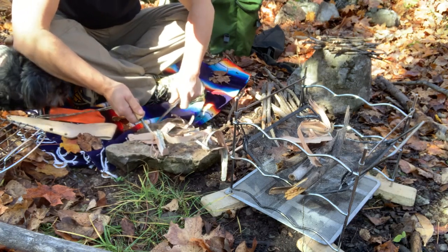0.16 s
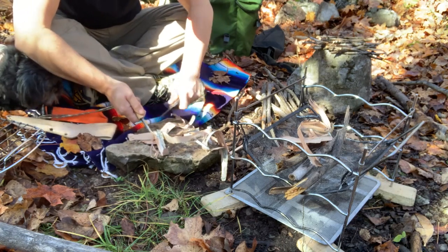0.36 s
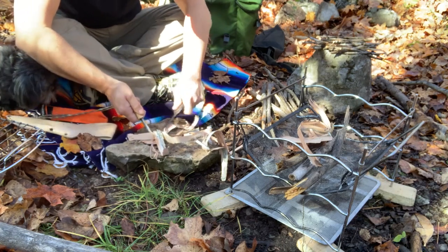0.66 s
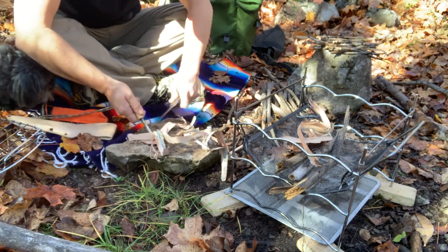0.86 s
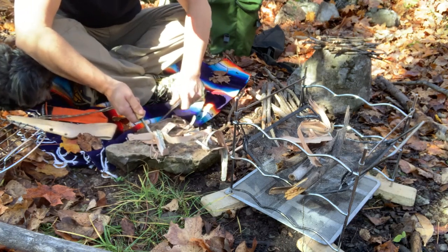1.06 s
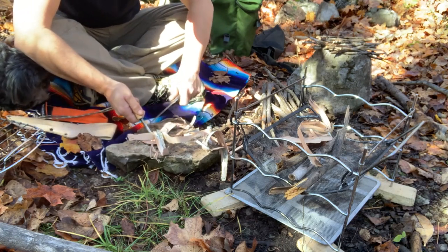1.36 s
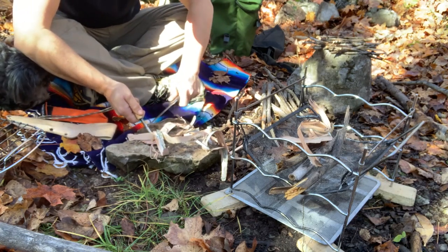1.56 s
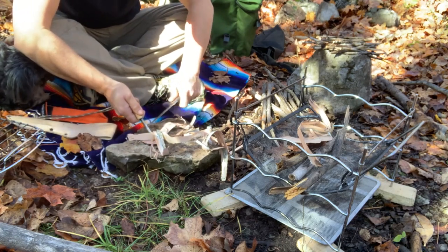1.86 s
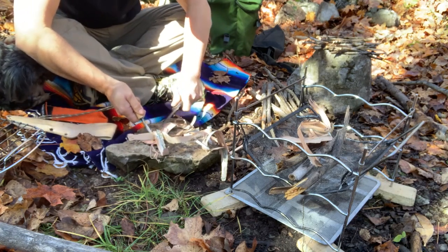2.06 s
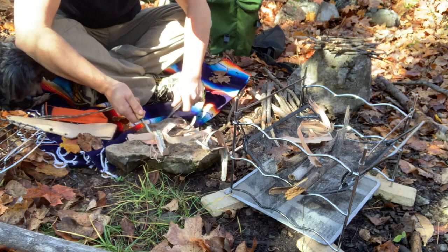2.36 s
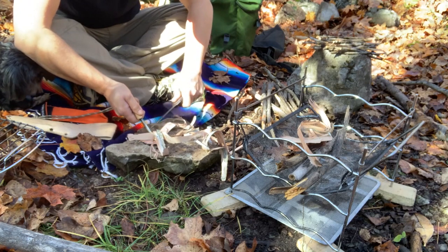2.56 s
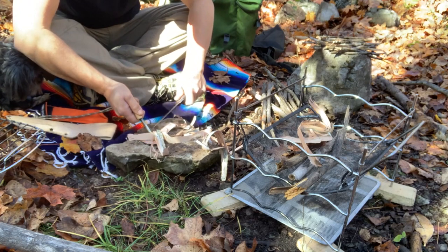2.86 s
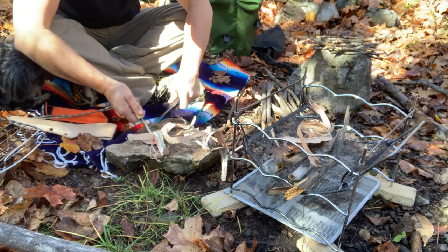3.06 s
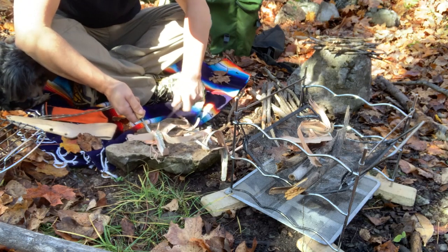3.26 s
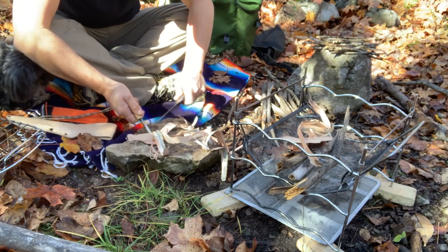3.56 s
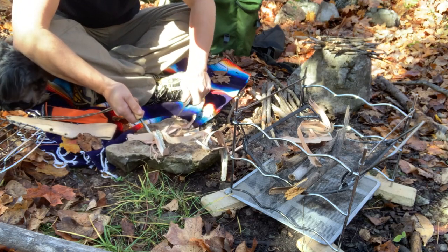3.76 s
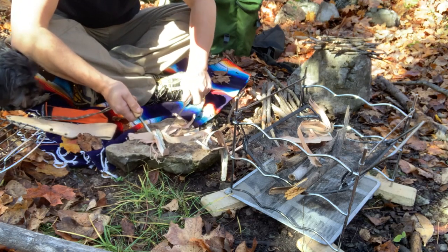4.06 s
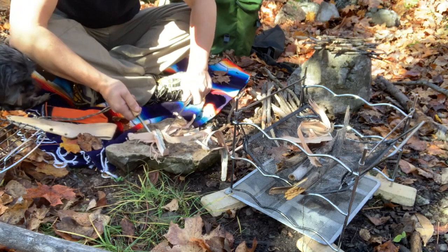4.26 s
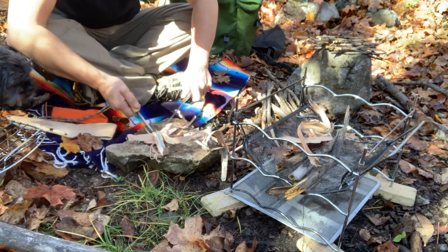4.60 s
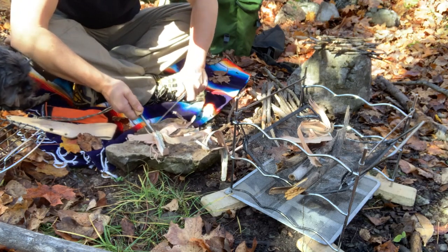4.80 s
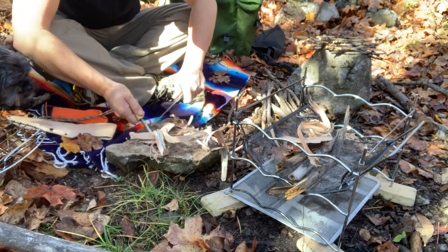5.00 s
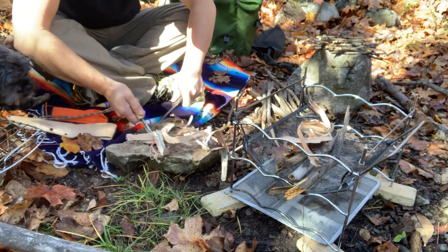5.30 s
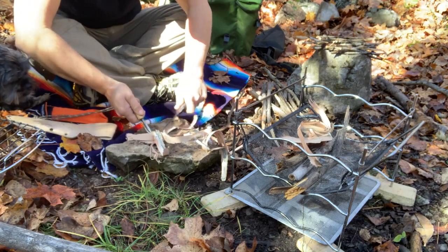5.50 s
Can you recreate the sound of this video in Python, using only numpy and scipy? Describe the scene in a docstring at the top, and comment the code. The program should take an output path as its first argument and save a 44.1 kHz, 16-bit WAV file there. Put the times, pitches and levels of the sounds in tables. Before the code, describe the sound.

Very close to the microphone, a steel striker scrapes a ferro rod in short, gritty, bright rasps with ringing edges and dry ticks. Bursts come in the first second, around two seconds and just after three, then dwindle to clicks and near quiet before a last quick scrape. Soft low outdoor rumble and a faint wavering engine lie behind, with slight echoes from ground and trees.

```python
"""Short, uneven rasps and sharp ticks sound close by: a steel striker scraped along a ferro rod outdoors.
The edge tears off tiny chips, made as random clicks that hiss and rasp and make the steel ring.
Snags are short crunches that ring the tip and knock the rod; a few dry leaves rustle softly.
Echoes follow from the ground and trees. Behind them a far engine drones in the low rumble of the woods."""
import sys
import numpy as np
from scipy import signal
from scipy.fft import rfft, irfft
from scipy.io import wavfile

SR = 44100
rng = np.random.default_rng(int(sys.argv[2]) if len(sys.argv) > 2 else 0)


def bounce(signal):
    """Save signal as a 16-bit WAV file at the path given by the first command-line argument."""
    frames = np.transpose(np.atleast_2d(signal))
    limited = np.clip(frames, -1, 1)
    pcm = np.round(limited * 32767).astype(np.int16)
    wavfile.write(sys.argv[1], SR, pcm)


N = 248724
TIME = np.arange(N) / SR   # seconds

# Resonances of the hand-held blade and rod: (frequency [Hz], width [Hz], level [dB])
STEEL_MODES = [(2310, 260, -15.5), (2664, 170, -15), (3360, 440, -12), (3980, 190, -4), (4310, 200, -4.5),
               (4890, 440, -6), (5650, 240, -4), (6050, 280, -5.5), (6570, 530, 1.5), (7154, 100, 0),
               (8000, 170, 1), (8480, 180, 2), (8820, 270, 0), (9190, 220, -8), (11700, 500, -4.5),
               (13740, 260, -7.5)]


def from_db(db):
    """Turn decibels into a gain."""
    return 10 ** (np.asarray(db) / 20)


def rms_one(x):
    """Scale a signal to an average power of one."""
    return x / np.sqrt(np.mean(x ** 2) + 1e-20)


def at_hz(points):
    """Read a (frequency, value) table at every spectral line, along a log-frequency axis."""
    hz, value = np.transpose(points)
    line_hz = np.fft.rfftfreq(N, 1 / SR) + 1   # the 1 avoids the log of zero
    return np.interp(np.log(line_hz), np.log(hz), value)


def colour(x, spectrum):
    """Shape a signal by a spectrum; white noise keeps its power."""
    gain = rms_one(from_db(at_hz(spectrum)))
    return irfft(rfft(x) * gain, N)


def drift(rate):
    """A random, gliding curve of spread 1 that takes about `rate` new values a second."""
    knots = np.cumsum(rng.uniform(1 / 2, 3 / 2, N // 20)) - 2
    return np.interp(TIME * rate, knots, rng.standard_normal(len(knots)))


def resonate(x, hz, width_hz):
    """Ring one resonance; a narrower one rings longer, and white noise keeps its power."""
    radius = np.exp(-np.pi * width_hz / SR)
    angle = 2 * np.pi * min(hz, SR / 2) / SR
    ringing = signal.lfilter([1, 0, -1], [1, -2 * radius * np.cos(angle), radius ** 2], x + 1e-18)
    return np.sqrt((1 - radius ** 2) / 2) * ringing


def add(out, s, sound):
    """Mix a sound into `out` at time s."""
    at = round(s * SR)
    out[at:at + len(sound)] += sound[:N - at]


def scrapes():
    """Each contact plays a run of fractures, heard directly as hiss and rasp and through the ringing steel."""
    # Chips tearing off: (frequency [Hz], relative density [dB])
    chip_spectrum = [(1400, -30.5), (2300, -5.5), (3200, 2.5), (4200, 8.5), (5200, 8.5), (7000, 0.5),
                     (9500, -8), (11000, -3), (15000, -27.5)]
    # Finest dust: (frequency [Hz], relative density [dB])
    dust_spectrum = [(7000, -21.5), (10000, 8), (12200, 12), (13400, 7.5), (14400, 13), (15400, 1.5),
                     (16000, -26.5)]
    # Dull part of the rasp: (frequency [Hz], relative density [dB])
    rasp_spectrum = [(120, 10.5), (220, 0), (400, -3.5), (700, -2.5), (1350, -1), (1750, -3.5), (2300, 2.5),
                     (3100, 0.5), (4500, -24)]
    wander_db, wander_per_s = 3, 60   # each mode swells and fades as the edge travels

    def mode_grip():
        """How strongly one mode is driven; random signs keep the modes from moving in step."""
        return rng.choice([-1, 1], N) * rms_one(from_db(wander_db * drift(wander_per_s)))

    grip = np.array([mode_grip() for _ in STEEL_MODES])
    coarse, fine, dull, ringing = np.zeros((4, N))
    for span, force, ring_db, ring_hz, tilt_db, dust_db, rasp_db in contacts():
        ring = from_db(ring_db)
        share = 1 / np.sqrt(1 + ring ** 2)   # the ring takes its power from the hiss
        coarse[span] += share * force
        ringing[span] += share * ring * steel(force, grip[:, span], ring_hz, tilt_db)
        fine[span] += force * from_db(dust_db)
        dull[span] += force * from_db(rasp_db)
    bright = colour(coarse, chip_spectrum) + colour(fine, dust_spectrum) + ringing
    return from_db(-4.0) * bright + colour(dull, rasp_spectrum)


def contacts():
    """Give each contact's samples, force, ring and colour settings; strokes tear densely, slides crackle."""
    # Firm strokes along the rod: (start [s], end [s], level [dB], swell from start to end [dB],
    # bite [0-1], ring against hiss [dB], first favoured pitch [Hz], second favoured pitch [Hz])
    stroke_table = [(0.118, 0.205, -56.5, 6, 0.42, 10, 2750, 4020),
                    (0.199, 0.231, -44, 15.5, 0.39, 10, 7190, 8050),
                    (0.246, 0.285, -42.5, 1, 0.76, 3, 7190, 6060),
                    (0.554, 0.561, -40.5, 3.5, 0.71, 2, 7190, 13600),
                    (0.591, 0.599, -45.5, -7, 0, 15, 4380, 2500),
                    (0.612, 0.617, -36.5, -4, 0.62, 6, 7190, 13600),
                    (0.668, 0.69, -41, -2, 0.85, 0, 8780, 11600),
                    (0.94, 0.969, -40, 4.5, 0.45, 12, 9450, 6060),
                    (0.977, 1.013, -38, -0.5, 0.86, 5, 8780, 6550),
                    (1.021, 1.032, -40.5, 11.5, 0.88, 11, 6550, 11600),
                    (1.047, 1.099, -50, -9.5, 1, -1, 8050, 11600),
                    (1.927, 1.932, -44, -3, 0.23, 26, 8400, 3950),
                    (1.955, 1.974, -32, 1.5, 0.64, 28, 6060, 9450),
                    (1.986, 2.008, -36.5, 4, 0.44, 12, 7190, 8780),
                    (2.108, 2.162, -40.5, 6, 0.89, 12, 6550, 6550),
                    (2.173, 2.216, -38, -2, 0.88, 10, 8050, 6550),
                    (2.233, 2.254, -35.5, 7, 0.5, 14, 8780, 6060),
                    (2.275, 2.287, -34.5, -0.5, 0.44, 24, 8780, 7190),
                    (2.297, 2.322, -52, -8, 0.9, -10, 7190, 8780),
                    (2.361, 2.448, -49, -12.5, 0.98, 3, 11600, 6550),
                    (2.468, 2.529, -43.5, -2.5, 0.94, 5.5, 11600, 6550),
                    (3.109, 3.123, -47, 0, 0.34, 11, 4380, 2500),
                    (3.193, 3.22, -35.5, 13.5, 0.73, 5.5, 7190, 9450),
                    (3.243, 3.268, -43.5, -10.5, 0.9, 2, 6550, 2500),
                    (3.296, 3.365, -42.5, -13, 0.86, 10, 6550, 5560),
                    (3.394, 3.463, -43, -4.5, 0.87, 3, 6550, 5560),
                    (5.434, 5.487, -48.5, 20.5, 0, 11, 3870, 6080),
                    (5.493, 5.51, -40, 11, 0.51, 8, 7190, 4380),
                    (5.512, 5.538, -47.5, -4, 1, 1, 4380, 6550)]
    # The blade slides lightly into place between strokes: (start [s], end [s], level [dB])
    slide_table = [(0.35, 0.431, -53.5), (0.511, 0.61, -58.5), (0.727, 0.741, -51), (0.778, 0.864, -53.5),
                   (1.123, 1.196, -52.5), (1.238, 1.292, -54), (1.401, 1.446, -59.5), (1.48, 1.522, -55),
                   (3.002, 3.078, -58), (3.171, 3.215, -54.5), (3.448, 3.603, -58.5), (3.612, 3.671, -53.5),
                   (3.743, 3.847, -65), (3.847, 3.972, -54.5), (4.114, 4.144, -51.5), (4.963, 5.053, -68),
                   (5.386, 5.404, -62.5), (5.59, 5.64, -58)]
    # How the edge skates, sings or digs in:
    # (bite [0-1], tilt of the ring [dB per octave], fine dust [dB], low rasp [dB])
    bite_table = [(0, -16.5, -30, -26), (.25, -10.5, -21, -20), (.5, -3, -8, -32), (.85, -4, -7, -11),
                  (1, 6.5, -1.5, -8)]
    slide_ring_db, slide_ring_hz, slide_tilt_db = -1.5, 6270, -3.5   # tilt is per octave
    slide_dust_db, slide_rasp_db = -9, -9
    slide_arch_db = 4   # a slide is this much softer at its ends

    tearing = chips(per_s=7500, size_db=1.5, chatter_hz=606.2, chatter_db=2.0, snag_db=2.0)
    crackle = chips(per_s=3500, size_db=3.5, chatter_hz=500, chatter_db=4.0, snag_db=-2.0)
    bites, *colours = np.transpose(bite_table)
    for start, end, level_db, swell_db, bite, ring_db, *ring_hz in stroke_table:
        span, along, edges_db = pressure(start, end)
        force = rms_one(tearing[span]) * from_db(level_db + swell_db * along + edges_db)
        tilt_db, dust_db, rasp_db = (np.interp(bite, bites, c) for c in colours)
        yield span, force, ring_db, ring_hz, tilt_db, dust_db, rasp_db
    for start, end, level_db in slide_table:
        span, along, edges_db = pressure(start, end)
        arch_db = -slide_arch_db * (2 * along) ** 2
        force = rms_one(crackle[span]) * from_db(level_db + arch_db + edges_db / 2)   # softer edges
        yield span, force, slide_ring_db, slide_ring_hz, slide_tilt_db, slide_dust_db, slide_rasp_db


def chips(per_s, size_db, chatter_hz, chatter_db, snag_db):
    """Tiny fractures of uneven size, most violent just after each slip of the edge."""
    slips_per_s, slip_db, slip_jitter = 205, 8, .25
    sizes = from_db(size_db * np.minimum(rng.exponential(1, N), 4)) * rng.choice([-1, 1], N)
    born = rng.random(N) < per_s / SR
    slip_rate = slips_per_s * np.exp(slip_jitter * drift(60))
    since_slip = np.cumsum(slip_rate / SR) % 1   # 0 just after a slip, near 1 before the next
    chatter = chatter_db * drift(chatter_hz)
    snagging = snag_db * drift(chatter_hz / 8)
    return rms_one(sizes * born * from_db(chatter + snagging - slip_db * since_slip))


def pressure(start, end):
    """Give a contact's samples, the way along it (-1/2 to 1/2) and the dB lost as the edge lands and lifts."""
    attack_db_per_s, release_db_per_s = 2501, 1090.5
    span = (TIME > start - .04) & (TIME < end + .06)
    t = TIME[span]
    along = np.clip((t - start) / max(end - start, 1e-3), 0, 1) - 1 / 2
    landing_db = -attack_db_per_s * np.maximum(start - t, 0)
    lifting_db = -release_db_per_s * np.maximum(t - end, 0)
    return span, along, landing_db + lifting_db


def steel(x, grip, favoured_hz, tilt_db):
    """The modes ring side by side, each driven by its own row of `grip`; the place of contact favours some."""
    favour_db, favour_octaves = 7.5, .035   # extra level, and how near a mode must lie to get it
    hz, width, db = np.transpose(STEEL_MODES)
    octaves_off = np.log2(hz[:, None] / favoured_hz)
    favour = np.exp(-(octaves_off / favour_octaves) ** 2 / 2).max(axis=1)
    gains = from_db(db + favour_db * favour + tilt_db * np.log2(hz / hz[0]))
    total = sum(gains[k] * resonate(x * grip[k], hz[k], width[k]) for k in range(len(hz)))
    return total / np.linalg.norm(gains)


def ticks(tip_width_hz, crack_db, tip_db, handle_hz, handle_width_hz, handle_db):
    """A landing or snag is a dry crunch that rings the tip, knocks the rod and thuds dully in its handle."""
    # The edge lands on the rod or snags: (time [s], level [dB], swell of the crunch [s],
    # pitch of the tip [Hz], pitch of the knock [Hz], level of the knock [dB])
    tick_table = [(0.1263, -49, 0.00046, 6330, 2100, 2), (0.2978, -43, 0.0016, 12000, 2430, -3),
                  (0.4238, -49.5, 0.002, 6700, 3520, -3), (0.506, -59.5, 0.00063, 8150, 3500, -9),
                  (0.5207, -50, 0.0006, 8600, 4140, -19), (0.6206, -46.5, 0.0013, 7200, 4400, -12),
                  (0.6617, -51, .001, 12500, 4100, -10), (0.7255, -49, 0.00095, 12000, 4400, -17),
                  (0.738, -60, 0.00067, 8000, 3500, -6), (0.751, -61, .0004, 11500, 3500, -12),
                  (0.997, -55, .0006, 6470, 1310, 8), (1.14, -52, 0.00094, 11600, 3500, -2),
                  (1.143, -47.5, 0.00073, 11600, 3700, -2), (1.1693, -55.5, 0.00036, 7700, 1910, -7),
                  (1.232, -55, 0.00071, 11920, 3760, -7), (1.271, -51.5, 0.00094, 12000, 2790, -21),
                  (1.417, -56, 0.00092, 12100, 3400, -17), (1.4325, -52.5, 0.00024, 11660, 3010, -8),
                  (1.4892, -44.5, 0.00065, 12300, 3500, -4), (1.4993, -51, 0.00059, 11850, 3300, -17),
                  (2.0715, -52, 0.00038, 7160, 3850, -13), (2.15, -50, 0.00088, 6500, 2280, -22),
                  (2.3603, -52.5, .0011, 10400, 3300, -9), (2.4613, -50.5, 0.00086, 10000, 3900, -9),
                  (2.487, -45, 0.0015, 11500, 2400, -6), (2.84, -67.5, 0.00027, 12000, 3980, -11),
                  (2.966, -67, .0003, 12000, 4400, -17), (3.009, -44, 0.00027, 12040, 3420, -19),
                  (3.0323, -43, .0006, 6100, 2230, 2), (3.069, -59.5, 0.0003, 11940, 3800, -12),
                  (3.1506, -62.5, .0004, 12090, 3500, -4), (3.3048, -41.5, .0004, 7600, 2350, -12),
                  (3.3808, -47, 0.0014, 10120, 3800, -15), (3.5814, -58.5, 0.00022, 13000, 4400, -17),
                  (3.6153, -54.5, 0.00092, 12350, 3500, -14), (3.6358, -51.5, 0.0018, 12400, 3500, -7),
                  (3.6563, -55.5, .001, 12200, 3450, 7.5), (3.6684, -52, 0.00057, 11160, 2610, -1),
                  (3.8598, -58, 0.00036, 8000, 1910, -15), (3.901, -55.5, .0003, 6070, 3270, -1.5),
                  (3.91, -48, 0.00046, 6310, 2800, -1.5), (3.9355, -57, 0.00032, 8990, 1530, -8),
                  (4.1175, -38, 0.00031, 12000, 1030, -8), (4.1228, -52, 0.00072, 12800, 2220, 4),
                  (4.129, -40, 0.00018, 12800, 1200, -6), (4.1604, -59, .0005, 10070, 3500, -15),
                  (4.2043, -51.5, 0.00022, 11360, 4000, -13), (5.0258, -59.5, 0.00033, 12180, 3600, -28),
                  (5.5296, -41, .0007, 10350, 1290, -3.5), (5.534, -52, 0.00094, 9000, 840, 8)]
    # Crack of a snag: (frequency [Hz], relative density [dB])
    crack_spectrum = [(300, 0.5), (700, -1), (1500, -8), (3000, 5), (7000, 7), (10000, 0.5), (12200, 2.5),
                      (14500, 5.5), (16000, -11.5)]
    knock_q = 6.6       # pitch of a knock over its width
    crack_reach = 1.9   # the crack dies away above this multiple of the tip's pitch

    crack, rings = np.zeros((2, N))
    t = np.arange(-SR // 200, SR // 30) / SR
    same_energy = np.sqrt(.002 * SR / len(t))   # as much energy as 2 ms at full power
    for s, level_db, swell_s, tip_hz, knock_hz, knock_db in tick_table:
        force = crunch(swell_s, np.maximum(t, 0)) * from_db(level_db) * same_energy
        rod = resonate(force, knock_hz, knock_hz / knock_q)
        handle = from_db(handle_db) * resonate(force, handle_hz, handle_width_hz)
        knock = from_db(knock_db) * (rod + handle)
        tip = from_db(tip_db) * resonate(force, tip_hz, tip_width_hz)
        blunt = signal.butter(2, min(crack_reach * tip_hz, SR / 2 - 1), fs=SR, output="sos")
        add(crack, s + t[0], from_db(crack_db) * signal.sosfilt(blunt, force))
        add(rings, s + t[0], tip + knock)
    return colour(crack, crack_spectrum) + rings


def crunch(swell_s, age):
    """A snag's burst of force swells and dies quickly and is about equally strong at all pitches."""
    burst = rng.standard_normal(len(age)) * age * np.exp(-age / max(swell_s, 1e-4))
    # Keep the timing (phase) but make every frequency equally strong.
    flat = irfft(np.exp(1j * np.angle(rfft(burst))), len(age))
    return rms_one(flat * np.exp(-age * 60))


def rustles(width_hz):
    """A dry leaf shifts: a short, soft swell of narrow hiss."""
    # Faint rustles: (time [s], length [s], pitch [Hz], level [dB])
    rustle_table = [(4.297, 0.033, 4660, -72), (4.612, 0.025, 5930, -72.5), (4.781, 0.044, 4200, -70.5)]
    out = np.zeros(N)
    for s, length_s, hz, level_db in rustle_table:
        swell = np.hanning(round(length_s * SR))
        hiss = resonate(rng.standard_normal(SR), hz, width_hz)[:len(swell)]
        add(out, s, from_db(level_db) * swell * hiss)
    return out


def widen(x):
    """Stereo widening: the hands are equally loud on both sides, with a left-right phase that changes with pitch."""
    # Phase by which the left side leads: (frequency [Hz], phase [radians])
    phase_table = [(300, 0), (1200, .3), (2000, 1.2), (2700, 2.9), (4200, 3.3), (6050, 3.5), (6550, 6.3),
                   (8000, 6.3), (9500, 3.1), (10100, 2.8), (11000, .1), (11700, -.2), (12900, -3),
                   (13600, -3.5), (14400, -5.6), (15700, -6.9)]
    turn = np.exp(1j * at_hz(phase_table) / 2)   # half forward on the left, half back on the right
    return irfft(rfft(x) * np.array([turn, turn.conj()]), N)


def near_echoes(x):
    """Stone, ground and arms reflect almost at once; the paths keep changing as the hands move."""
    place = 2 * drift(20)
    one, other = (echoes(x, first_s=0.00054, t60=0.025) for _ in range(2))
    return np.cos(place) * one + np.sin(place) * other


def echoes(x, first_s, t60):
    """Scattered reflections, different on each side, fade by 60 dB in t60 seconds."""
    age = np.arange(SR // 2) / SR
    response = rng.standard_normal((2, len(age))) * from_db(-60 * age / t60) * (age > first_s)
    response = response / np.linalg.norm(response, axis=1, keepdims=True)
    return signal.fftconvolve(x[None], response, axes=1)[:, :N]


def engine(octave_db, flutter_db):
    """Only the firing tone and its octave carry this far, wavering on their way."""
    # Far engine, slower by the end: (time [s], firing rate [Hz])
    speed_table = [(0, 120), (1.2, 124), (1.7, 120), (2.15, 102), (2.6, 104), (3.25, 105), (3.9, 90),
                   (4.35, 94), (5.64, 94)]
    # Loudness of the drone: (time [s], level [dB])
    level_table = [(0, -65.5), (.6, -56), (1.4, -66.5), (1.9, -55.5), (2.6, -58.5), (3.3, -65),
                   (3.8, -68.5), (4.3, -57.5), (5.1, -54.5), (5.64, -54.5)]
    firing_hz = np.interp(TIME, *np.transpose(speed_table)) + drift(11)
    phase = 2 * np.pi * np.cumsum(firing_hz) / SR
    tone = np.sqrt(2) * (np.sin(phase) + from_db(octave_db) * np.sin(2 * phase))
    level_db = np.interp(TIME, *np.transpose(level_table))
    return tone * from_db(level_db + flutter_db * drift(8.1))


def air():
    """Steady rumble and far rustle: shaped noise, most alike on the two sides in the bass."""
    # Air of the woods: (frequency [Hz], relative density [dB])
    air_spectrum = [(22, -33), (35, -5), (55, 2), (80, 0.5), (120, -5.5), (190, -9.5), (330, -21),
                    (600, -17), (1300, -21.5), (1700, -31.5), (2300, -44.5), (5000, -48), (7500, -47.5),
                    (10000, -50.5), (15500, -52.5)]
    # Left-right likeness: (frequency [Hz], likeness [-1 to 1])
    likeness_table = [(50, 0.97), (130, 0.64), (260, 0.83), (500, -0.12), (800, -0.16), (1200, -0.16),
                      (2200, 0.24), (12000, -0.18)]
    mid, side = rfft(rng.standard_normal((2, N)))
    alike = np.clip(at_hz(likeness_table), -1, 1)
    noise = irfft(np.sqrt(1 + alike) * mid + np.sqrt(1 - alike) * side * [[1], [-1]], N)
    return from_db(-56) * colour(noise, air_spectrum)


def scene():
    """The hands close by, echoes from the ground and the trees, the woods behind."""
    snags = ticks(tip_width_hz=1100, crack_db=6.5, tip_db=1.0,
                  handle_hz=1064, handle_width_hz=1930, handle_db=-14.5)
    hands = scrapes() + rustles(width_hz=650) + snags
    ground = from_db(-7) * near_echoes(hands)
    trees = from_db(-18.5) * echoes(hands, first_s=0.013, t60=0.28)
    woods = air() + engine(octave_db=-20.5, flutter_db=3.5)
    far = woods * from_db([[-.6], [.6]])   # slightly louder on the right
    return widen(hands) + ground + trees + far


def record(dry):
    """Cut the top steeply above 16 kHz with a low-pass filter."""
    low_pass = signal.ellip(10, .1, 80, 16000, fs=SR, output="sos")   # 0.1 dB ripple, 80 dB cut
    return signal.sosfilt(low_pass, dry)


dry = scene()
out = record(dry)
bounce(out)
```